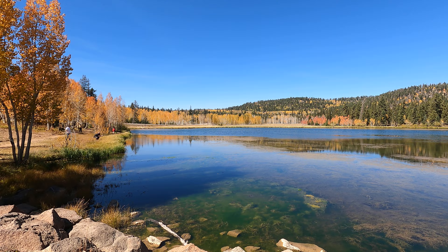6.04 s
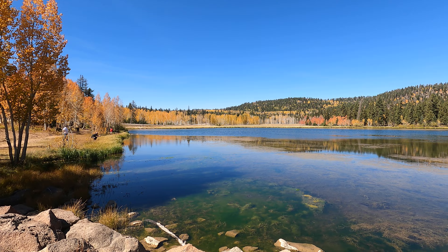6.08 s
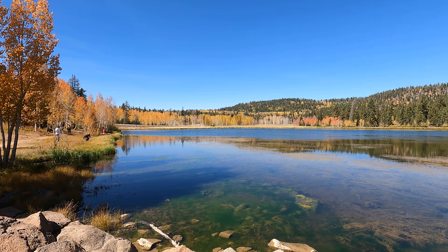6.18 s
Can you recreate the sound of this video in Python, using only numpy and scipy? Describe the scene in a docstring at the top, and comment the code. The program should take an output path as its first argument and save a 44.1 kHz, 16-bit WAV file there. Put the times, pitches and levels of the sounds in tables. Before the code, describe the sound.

A chipmunk chirps sharply about once a second by a lake while wind rumbles on the microphone and a grasshopper crackles on the left.

```python
"""A mountain lake shore in light wind, over a steady bed of low air, far forest and leaf hiss.
From the start two gusts (shaped noise, swinging thumps) buffet the microphone for four seconds, while a
flying grasshopper snaps its wings in pairs (noise bursts) to the end, among faint moans and dry ticks.
From 1.2 s a chipmunk gives five arched chirps (four partials) slightly to the left; water plops (gliding
sines) at 3.8 and 4.5 s. The wind drops at about 4 s, between the plops; air and leaves then stand out."""
import sys
import numpy as np
from scipy import signal
from scipy.fft import rfft, irfft, next_fast_len
from scipy.io import wavfile
from scipy.ndimage import uniform_filter1d, map_coordinates

SR = 44100
rng = np.random.default_rng(int(sys.argv[2]) if len(sys.argv) > 2 else 0)


def int16_out(signal):
    """Quantize to a 16-bit WAV file."""
    q = np.round(np.clip(np.atleast_2d(signal).T, -1, 1) * 32767)
    wavfile.write(sys.argv[1], SR, q.astype(np.int16))


N = 274652
TOP_HZ = 15650

# wind
FLUTTER_DB, FLICKER_DB = -8, 1.8  # flutter under the rumble; depth of its fast flicker
FLUTTER_ONSET_DB, FLUTTER_TOP_DB = -66, -36.5  # wind strengths where flutter sets in and levels off
LUMP_DB, LUMPS_PER_S = 4.5, 14  # turbulence within a gust: depth and rate
THUMP_CYCLES = 0.56  # half length of a thump, in cycles

FAR_AIR_DB = -69

# grasshopper
BEAT_S, SECOND_SNAP_S = 0.172, 0.027  # nominal beat spacing; first to second snap of a beat
FILL_BEAT_DB, SNAP_SCATTER_DB = -64.5, 2.2  # relative level of fill-in beats; spread from snap to snap
SNAP_T60_S = 0.0045

# chipmunk
TREMBLE_DB, GRAIN = 1.1, 0.3  # depths of random level flutter and of roughness


def amp(db):
    """Decibels to gain."""
    return 10 ** (np.asarray(db) / 20)


def unit(x):
    """Scaled to rms 1."""
    return x / np.sqrt(np.mean(x ** 2) + 1e-20)


def along(points, hz):
    """(Hz, value) points interpolated on a log-frequency axis."""
    f, v = np.transpose(points)
    return np.interp(np.log(hz + 1), np.log(f + 1), v)


def curves(rows):
    """One value per sample for each column after the time."""
    s, *cols = np.transpose(rows)
    return [np.interp(np.arange(N) / SR, s, c) for c in cols]


def wobble(rate):
    """A smooth random curve, rate knots a second."""
    knots = rng.standard_normal(int(N * rate / SR) + 4)
    return map_coordinates(knots, [np.arange(N) * rate / SR])


def band(hz, centre_hz, octaves):
    """A bell of gain on a log-frequency axis."""
    return np.exp(-(np.log2((hz + 1) / centre_hz) / octaves) ** 2)


def filtered(x, response):
    """x times a complex response of frequency."""
    m = next_fast_len(N + SR // 2)
    return irfft(rfft(x, m) * response(np.fft.rfftfreq(m, 1 / SR)), m)[..., :N]


def placed(x, left_db, lead_s=0):
    """Mono to stereo, left_db louder and lead_s earlier on the left."""
    sides = np.array([[0.5], [-0.5]])
    return filtered(x, lambda hz: amp(sides * left_db) * np.exp(2j * np.pi * hz * sides * lead_s))


def rush(spectrum, alike, patchy_db):
    """Stereo noise scaled to rms 1, with random time-frequency patches and set left-right likeness."""
    z = signal.stft(rng.standard_normal((2, N)), nperseg=512)[2]
    field = uniform_filter1d(rng.standard_normal(z.shape[1:]), size=6, axis=0)
    field = uniform_filter1d(field, size=14, axis=1)
    pair = signal.istft(z * amp(patchy_db * unit(field)), nperseg=512)[1][:, :N]

    def mid_side(hz):
        turn = np.arccos(np.clip(along(alike, hz), -1, 1)) / 2
        return amp(along(spectrum, hz)) * [np.cos(turn), np.sin(turn)]

    mid, side = filtered(pair, mid_side)
    return np.array([mid + side, mid - side]) / np.std(mid)


def woods(x, build_s):
    """Trunks scatter a sound into a soft tail that builds up and dies away."""
    # decay among the trunks: (frequency [Hz], t60 [s])
    decay_t60 = [(500, 0.25), (4000, 0.23), (12000, 0.11)]
    hz, t, z = signal.stft(rng.standard_normal((2, SR // 2)), SR, nperseg=256)
    fade = amp(-60 * t / along(decay_t60, hz)[:, None]) * (1 - np.exp(-t / build_s))
    tail = signal.istft(z * fade, SR, nperseg=256)[1]
    return signal.fftconvolve(x, tail / np.linalg.norm(tail[0]), axes=1)[:, :N]


def scattered(x, spread_s, spectrum, alike, patchy_db):
    """Foliage returns the energy of a sound as a hiss, smeared over several spread_s."""
    age = np.arange(SR // 3) / SR
    spread = age ** 2 * np.exp(-age / spread_s)
    echo = np.sqrt(np.abs(signal.fftconvolve(x ** 2, spread / spread.sum())[:N]))
    return echo * rush(spectrum, [(8000, alike)], patchy_db)


def crackles(rows, t60):
    """One decaying noise burst of set energy, cut at 25 ms, for each (s, dB) row."""
    out, t = np.zeros(N + SR), np.arange(SR // 40) / SR
    bursts = rng.standard_normal((len(rows), len(t))) * amp(-60 * t / t60)
    for (s, db), burst in zip(rows, bursts):
        out[round(s * SR):][:len(t)] += amp(db) * burst / np.linalg.norm(burst)
    return out[:N]


def shore():
    """The outdoor bed: a low murmur of air, wind in the far forest, and dry leaves hissing."""
    # leaf rustle: (time [s], relative level [dB])
    breeze = [(0, -73), (3.9, -73), (5.6, -70.5), (6.23, -72.5)]
    # low air murmur: (time [s], level [dB])
    murmur = [(0, -64), (4.2, -65.5), (6.23, -62)]
    # noise spectra: (frequency [Hz], relative level [dB])
    low_spectrum = [(20, 1), (60, -19.5), (110, -24), (140, -2), (175, 2), (250, -6), (400, -11),
                    (600, -18), (900, -24.5), (2000, -55)]
    far_spectrum = [(410, -49), (700, -10), (826, -15), (1010, -2), (1190, 0.5), (1400, 1), (1650, -2),
                    (1960, -4), (2020, -4), (2360, -7), (3200, -9), (4160, -17), (7040, -120)]
    leaf_spectrum = [(1500, -44), (2800, -17), (3600, -2), (5400, 3), (6800, 0.5), (8200, -6.5),
                     (10000, -12.5), (11000, -17.5), (12200, -13.5), (13200, -25), (15500, -48)]
    # left-right likeness: (frequency [Hz], correlation [0-1])
    likeness = [(60, 0.56), (150, 1), (380, 0.18), (950, 0.64), (2380, 0.58), (5980, 0.7), (15000, 0.2)]
    # stereo balance: (frequency [Hz], left minus right [dB])
    balance = [(100, -2.5), (600, -4), (1300, 0), (2400, 1.5), (4400, 0.5), (8000, 3), (14000, 4)]
    leaves_db, = curves(breeze)
    murmur_db, = curves(murmur)
    low = amp(murmur_db + 0.35 * wobble(7.8)) * rush(low_spectrum, [(200, 0.67)], patchy_db=1.5)
    far = amp(FAR_AIR_DB + 0.18 * wobble(3.37)) * rush(far_spectrum, likeness, patchy_db=1.55)
    leaves = amp(leaves_db + 1.5) * rush(leaf_spectrum, likeness, patchy_db=1.0)
    sides = np.array([[0.5], [-0.5]])
    return filtered(low + far + leaves, lambda hz: amp(sides * along(balance, hz)))


def eddies(spectrum, alike):
    """Low turbulence whose slow swells are evened out, so that the gusts set its strength."""
    noise = rush(spectrum, [(50, alike)], patchy_db=3.5)
    power = uniform_filter1d(noise.mean(axis=0) ** 2, size=3000)
    return noise / np.sqrt(np.abs(power) + 0.023)


def wind():
    """Gusts rumble on the microphone ports; smaller, faster eddies set in above a threshold strength."""
    # wind strength at the microphone: (time [s], relative level [dB])
    gusts = [(0.0, -51), (0.23, -52.5), (0.32, -41.5), (.47, -41), (.58, -41), (.7, -39), (1.08, -39),
             (1.2, -44), (1.3, -45.5), (1.65, -44.5), (1.85, -55.5), (2.1, -50.5), (2.19, -43), (2.75, -42),
             (3.1, -39.5), (3.3, -44.5), (3.88, -51), (4.08, -69), (4.4, -63), (5.2, -62), (5.38, -82),
             (5.8, -65.5), (6.23, -85)]
    # eddy spectra: (frequency [Hz], relative level [dB])
    rumble_spectrum = [(10, -5.5), (22, 2), (32, -3.5), (45, 1.5), (60, 3.5), (85, -22.5), (300, -85)]
    flutter_spectrum = [(35, -11.5), (55, 2), (78, 0), (105, -6), (140, -11), (200, -18.5), (320, -27.5),
                        (600, -46.5), (1500, -80)]
    strength_db, = curves(gusts)
    lumps_db = LUMP_DB * np.tanh(wobble(LUMPS_PER_S))
    rumble = amp(strength_db + lumps_db - 1.5) * eddies(rumble_spectrum, alike=0.4)
    slow = filtered(rumble, lambda hz: 1 / (1 + (hz / 56) ** 12))
    excess = np.maximum(amp(strength_db) - amp(FLUTTER_ONSET_DB), 0)
    levelled = excess / np.hypot(1, excess / amp(FLUTTER_TOP_DB))
    flicker_db = FLICKER_DB * np.tanh(wobble(24.8))
    fast = levelled * amp(FLUTTER_DB + lumps_db + flicker_db)
    return slow + fast * eddies(flutter_spectrum, alike=0.56)


def thumps():
    """A large eddy passes the ports as one swing of pressure, a little differently at each."""
    # single eddies: (time [s], pitch [Hz], level [dB])
    large_eddies = [(0.339, 42, -34.5), (.426, 59.3, -31.5), (.492, 200, -46), (0.661, 78.6, -28),
                    (.738, 34, -29.5), (.83, 131, -41), (0.966, 71, -34), (1.065, 48.3, -32),
                    (1.1, 45, -29), (2.186, 60.3, -33), (2.42, 54.6, -32.5), (2.888, 97, -39.5),
                    (3.017, 36.4, -32), (3.113, 47.7, -35), (3.155, 45.4, -33), (4.3, 24.8, -40.5),
                    (5.831, 28, -49.5)]
    t, out = np.arange(N) / SR, np.zeros((2, N))
    turns_rad = 0.5 * rng.standard_normal((len(large_eddies), 2, 1))
    for (s, hz, db), turn_rad in zip(large_eddies, turns_rad):
        cycles = hz * (t - s)
        swing = np.sin(2 * np.pi * cycles + turn_rad)
        out += amp(db) * np.exp(-(cycles / THUMP_CYCLES) ** 2) * swing
    return out


def moans():
    """A faint tone, perhaps air in the branches, swells and fades; its pitch arches with it."""
    # distant tones: (time [s], crest pitch [Hz], half length [s], crest rms level [dB])
    tones = [(.26, 527, 0.13, -74.5), (.79, 439.4, 0.27, -68), (5.34, 446, 0.044, -71),
             (5.67, 472.5, 0.022, -66)]
    t, out = np.arange(N) / SR, np.zeros(N)
    waver = 1 + 0.023 * wobble(70)
    for s, crest_hz, half_s, db in tones:
        swell = np.exp(-((t - s) / half_s) ** 2)
        arch = 1 - 0.36 * (1 - np.exp(-((t - s) / 0.22) ** 2))
        phase = 2 * np.pi * np.cumsum(crest_hz * waver * arch) / SR
        out += np.sqrt(2) * amp(db) * swell * np.sin(phase)
    return out


def dry_ticks():
    """Dry ticks, one of them (3.48 s) a grasshopper wing snap: noise bursts, each with a pitch and decay."""
    # ticks: (time [s], relative level [dB], pitch [Hz], t60 [s])
    tick_rows = [(1.254, -56, 4200, .005), (3.218, -59.5, 5650, 0.044), (3.4405, -63, 4900, .008),
                 (3.4805, -60, 4400, .014), (3.5, -56.5, 3300, 0.044), (4.748, -54, 4800, .025),
                 (4.7634, -65, 7000, .012), (5.1934, -57, 4900, .05)]
    ticks = np.zeros(N)
    for s, db, pitch_hz, t60_s in tick_rows:
        ticks += filtered(crackles([(s, db)], t60_s), lambda hz: band(hz, pitch_hz, octaves=0.64))
    direct = placed(amp(25) * ticks, left_db=6)
    return direct + amp(-11) * woods(direct, build_s=0.0041)


def water():
    """A small pocket of air closes at the rocks and rings for a few cycles."""
    # air pockets: (time [s], nominal pitch [Hz], length [s], level [dB], glide [octaves per length])
    pockets = [(3.8125, 2350, .003, -55, -.5), (3.8137, 1390, 0.0041, -38, -0.043),
               (3.82, 1750, 0.005, -57, -0.67), (4.478, 553, 0.0096, -53.5, -0.084)]
    t, plops = np.arange(N) / SR, np.zeros(N)
    for s, hz, length_s, db, glide in pockets:
        u = np.clip((t - s) / length_s, 0, 1)
        cycles = hz * length_s * u * 2 ** (glide * (u - 1) / 2)
        plops += amp(db) * np.sin(np.pi * u) ** 2 * np.sin(2 * np.pi * cycles)
    direct = placed(plops, left_db=2.0)

    def echoes(hz):
        later = amp(-16) * np.exp(-2j * np.pi * hz * 0.00583)
        sooner = amp(-20) * np.exp(-2j * np.pi * hz * 0.0053)
        return later + sooner

    rocks = filtered(direct, echoes)
    return direct + rocks + amp(-17) * woods(direct, build_s=0.003)


def wing_snaps():
    """(s, dB) of every snap: beats of one fixed level fill the gaps between set ones; each snaps twice."""
    # wingbeats with set times and levels: (time [s], relative level [dB])
    set_beats = [(0.072, -57), (.356, -63.5), (.846, -61), (1.2148, -61), (1.565, -61.5), (1.744, -58.5),
                 (2.263, -59.5), (2.449, -58.5), (2.628, -59), (2.9434, -58.5), (3.121, -62), (3.2985, -62),
                 (3.4578, -60.5), (3.7713, -65), (4.1082, -65), (4.2961, -61.5), (4.4718, -63),
                 (4.656, -57), (4.8352, -54), (5.012, -59), (5.367, -58.5), (5.5418, -62), (5.722, -61.5),
                 (6.0752, -65)]
    beats = list(set_beats)
    for (start, _), (end, _) in zip(set_beats, set_beats[1:]):
        count = max(round((end - start) / BEAT_S), 1)
        beats += [(start + (end - start) * k / count, FILL_BEAT_DB) for k in range(1, count)]
    scatter_db = SNAP_SCATTER_DB * rng.standard_normal((len(beats), 2))
    return [(s + k * SECOND_SNAP_S, db + off_db[k])
            for (s, db), off_db in zip(beats, scatter_db) for k in range(2)]


def grasshopper():
    """Wing membranes snap taut in brief bright crackles, and the trees answer with a soft hiss."""
    # snap colour: (frequency [Hz], gain [dB])
    wing_colour = [(1000, -51), (2500, 3), (4000, 3), (7500, 3.5), (10000, -2.5), (12000, -1.5),
                   (13500, -12), (15500, -16)]
    # colour of the echo in the trees: (frequency [Hz], relative level [dB])
    echo_colour = [(1500, -7), (3500, -0.5), (7000, 3), (10000, -6), (12200, -4.5), (13300, -23),
                   (15500, -17)]
    bursts = crackles(wing_snaps(), t60=SNAP_T60_S)
    snaps = amp(13.0) * filtered(bursts, lambda hz: amp(along(wing_colour, hz)))
    hiss = amp(1.5) * scattered(snaps, spread_s=0.008, spectrum=echo_colour, alike=0.14, patchy_db=5.5)
    return placed(snaps, left_db=19.5) + placed(hiss, left_db=3.5)


def chipmunk():
    """Each chirp is one arch of pitch: a raspy squeak in the upper partials opens, the second one leads."""
    # chirps: (crest time [s], crest pitch [Hz], rise [s], fall [s], pitch depth of the rise [0-1],
    #   rasp [0-1], partials 1, 2, 3 relative levels [dB, dB, dB], swell of partial 2 at the crest [dB],
    #   squeak relative level [dB], squeak lead [s], squeak half length [s])
    chirps = [(1.214, 2094, .027, 0.028, 0.2, 0.14, -62.5, -58.5, -63, 4.5, -67, 0.016, .005),
              (2.464, 2133, .032, .033, 0.15, 0.26, -60.5, -54.5, -59, 5, -57.5, 0.015, 0.0079),
              (3.413, 2080, 0.0257, .030, .08, 0.33, -68.5, -49.5, -74, 2, -64, .019, 0.01),
              (4.195, 2160, .022, .0255, .25, 0.3, -72, -48, -63, -0.5, -62, 0.021, .0078),
              (5.132, 2088, 0.029, 0.022, 0.22, .5, -69.5, -51, -63, 2, -56.5, 0.021, 0.0097)]
    # throat colour: (frequency [Hz], gain [dB])
    throat = [(2000, 0.5), (3400, -1), (4000, -1), (4350, -10), (5100, 3), (6000, -4), (6700, -1),
              (7600, -18), (10000, 1)]
    # colour of the echo in the leaves: (frequency [Hz], relative level [dB])
    echo_colour = [(1500, -14), (2900, -16), (3600, -1), (4200, -2), (5000, -7), (6500, -14), (8500, -41)]
    t, voice = np.arange(N) / SR, np.zeros(N)
    jitter, tremble = 0.009 * wobble(500), amp(TREMBLE_DB * wobble(300))
    grit, grain = wobble(1500), GRAIN * wobble(1100)
    for (s, crest_hz, rise_s, fall_s, depth, rough, first_db, second_db, third_db,
         swell_db, squeak_db, lead_s, squeak_s) in chirps:
        now = np.abs(t - s) < 0.06
        age = t[now] - s
        u = age / np.where(age < 0, rise_s, fall_s)  # -1 at the start, 0 at the crest, 1 at the end
        away = np.minimum(np.abs(u), 1.2)
        rasp = rough * grit[now] * (0.65 + away ** 2)  # clearest at the crest, hoarse at both ends

        rise_sag = depth * np.sin(np.pi / 2 * np.minimum(away, 1) ** 1.15) ** 2
        sag = np.where(u < 0, rise_sag, 0.187 * away ** 2.0)
        phase = 2 * np.pi * np.cumsum(crest_hz * (1 - sag + jitter[now])) / SR

        body = np.exp(-np.abs((u - 0.09) / 0.73) ** 6)
        crest = np.exp(-(age / 0.0059) ** 2)
        opening = 0.12 * np.exp(-((u + 0.75) / 0.34) ** 2)  # partial 2 creeps in under the squeak
        squeak = amp(squeak_db) * np.exp(-np.abs((age + lead_s) / squeak_s) ** 3)

        first = amp(first_db) * np.exp(-np.abs((u - 0.2) / 0.77) ** 2) * np.sin(phase + rasp)
        second_shape = body * (1 + 0.08 * np.tanh(2 * u)) + opening
        second = amp(second_db + swell_db * crest) * second_shape * np.sin(2 * phase + rasp / 2)
        third_level = amp(third_db - 2.5 + 2.8 * crest) * body + squeak
        third = third_level * np.sin(3 * phase + 3 * rasp / 2)
        fourth_level = amp(third_db - 11.0) * body + amp(-1.5) * squeak
        fourth = fourth_level * np.sin(4 * phase + 2 * rasp)
        partials = first + (1 + rough * grain[now]) * second + (1 + rasp) * (third + fourth)
        voice[now] += np.sqrt(2) * tremble[now] * partials
    voice = filtered(voice, lambda hz: amp(along(throat, hz)))

    # air forced through the narrow throat hisses along with the tone
    effort = np.sqrt(np.abs(uniform_filter1d(voice ** 2, size=200)))
    noise = rng.standard_normal(N)
    hiss = unit(filtered(noise, lambda hz: band(hz, centre_hz=4940, octaves=0.65)))
    direct = placed(voice + amp(-17.0) * effort * hiss, left_db=1.0, lead_s=2e-5)

    echo = scattered(voice, spread_s=0.016, spectrum=echo_colour, alike=0.54, patchy_db=3)
    leaves = amp(-16.5 + 2.5 * wobble(130)) * echo
    trunks = amp(-14.5) * woods(direct, build_s=0.0024)
    return direct + leaves + trunks


def scene():
    """Everything heard from the rocks at the water's edge."""
    background = shore() + wind() + thumps() + moans()
    return background + dry_ticks() + water() + grasshopper() + chipmunk()


def record(dry):
    """A sharp band limit: nothing passes at or above TOP_HZ."""
    return filtered(dry, lambda hz: hz < TOP_HZ)


dry = scene()
out = record(dry)
int16_out(out)
```